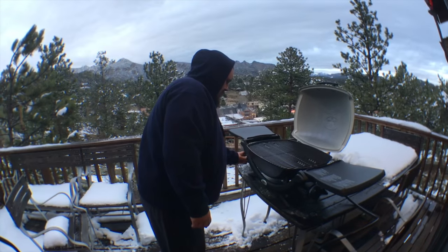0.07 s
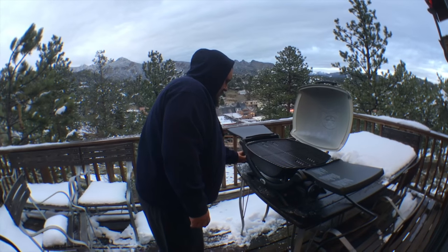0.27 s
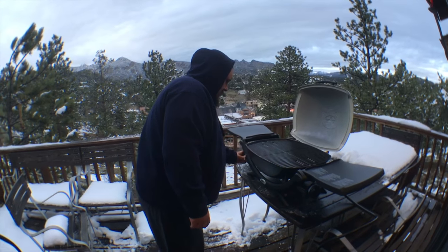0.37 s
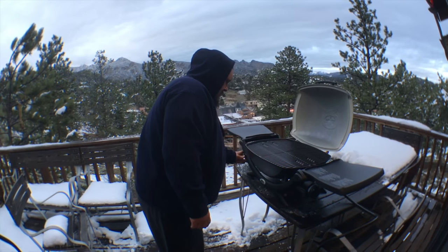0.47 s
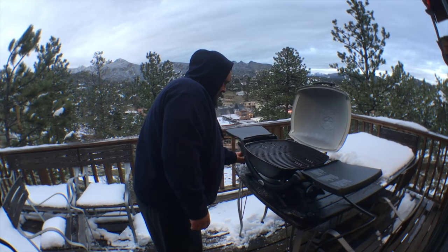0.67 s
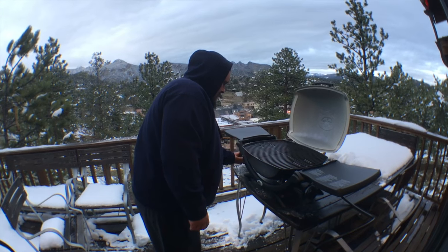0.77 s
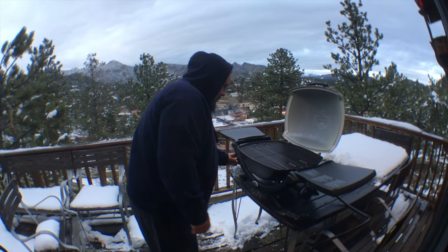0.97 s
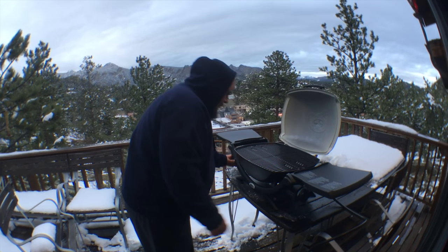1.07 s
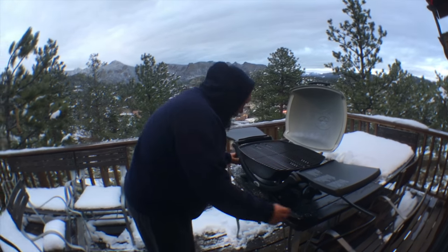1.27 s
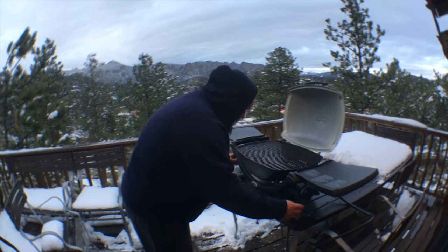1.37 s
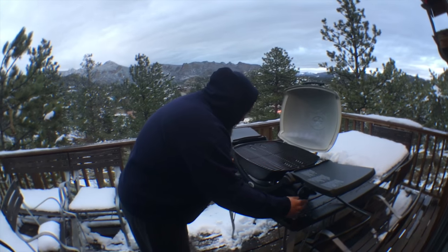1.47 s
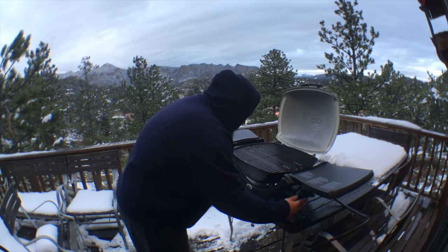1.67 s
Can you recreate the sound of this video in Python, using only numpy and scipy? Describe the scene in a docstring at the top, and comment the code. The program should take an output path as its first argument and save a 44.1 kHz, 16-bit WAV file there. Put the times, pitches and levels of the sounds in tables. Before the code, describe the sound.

A gas grill's push-button igniter snaps three times with a metallic ring, no flame, outdoors

```python
"""A push-button igniter on a gas grill, outdoors: filtered noise for the air, with a faint even treble ticking.
The button creaks in (rubbing noise through resonances) and its spring squeaks (short wavering sines).
The hammer snaps at 0.23, 0.72 and 1.41 s; each time a dense ring builds up in the metal body and dies,
with clear modes in it. Low background noise swells from 0.48 s; finger ticks and brushing (noise bursts)
come from 0.56 s. The button springs back, creaking, after snaps; the last creak is at 1.67 s."""
import sys
import numpy as np
from scipy import signal
from scipy.fft import rfft, irfft, next_fast_len
from scipy.io import wavfile
from scipy.ndimage import uniform_filter1d, map_coordinates

SR = 44100
rng = np.random.default_rng(int(sys.argv[2]) if len(sys.argv) > 2 else 0)


def wav_record(signal):
    """Record a signal, one row per channel, as 16-bit PCM in the file named by sys.argv[1]."""
    frames = np.transpose(np.atleast_2d(signal))
    bounded = np.clip(frames, -1, 1)
    # unit amplitude maps onto the largest positive 16-bit level
    quanta = np.round(bounded * 32767).astype(np.int16)
    wavfile.write(sys.argv[1], SR, quanta)


N = 77175

# All levels are ahead of the low cut and band limit in record().
# Outdoor air, spectrum shape: (frequency [Hz], relative level [dB])
AIR_SPECTRUM = [(26, -56), (45, 2.5), (356, -2), (568, -7.5), (709, -6), (1160, -7), (1680, -11),
                (1850, -12.5), (2100, -7.5), (2260, -14), (3780, -19), (4720, -21), (7920, -33),
                (16200, -42.5)]
AIR_RMS_DB, AIR_PATCH_DB = -64.5, 1.9
# Treble resonances of the even ticking: (centre [Hz], width [Hz], gain [dB])
TICKING_RESONANCES = [(8000, 900, 0), (10000, 1000, -2), (13500, 3000, -11), (6000, 1500, -10)]
TICKING_RATE_HZ, TICKING_START_S = 59.94, 0.0068
TICKING_PULSE_DB, TICKING_SPREAD_DB = -54, 0.83

# Button resonance centres: (frequency [Hz])
BUTTON_CENTRES_HZ = [1650, 2150, 2700, 3400, 4150, 4750, 6500, 8800, 9800, 11200, 12400]
# The same resonances: (width [Hz], gain before each creak's offsets [dB])
BUTTON_WIDTHS_GAINS = [(300, -2), (300, 1), (350, -4), (400, -4), (300, 2), (300, -5), (350, -11),
                       (350, -6), (350, -9), (400, -12), (400, -12)]
# Button creaking in or springing back: (time [s], level [dB], hold [s], t60 [s],
# offset of low resonances [dB], offset of high resonances [dB], roll-off [Hz])
BUTTON_CREAKS = [(.002, -58, .008, .08, -6, 4, 11500), (.150, -57, .012, .06, 8, 0, 6800),
                 (.165, -60, .065, .03, 2, 0, 7000), (.183, -56, .01, .06, 10, 0, 5000),
                 (.497, -54, .008, .05, -3, -7, 10000), (.514, -56, .012, .1, 5, -3, 13500),
                 (.606, -60, .012, .07, 12, 0, 3000), (.634, -62, .02, .05, 0, 0, 7000),
                 (.665, -65, .04, .04, 8, 0, 7000), (.699, -59, .005, .04, -8, 0, 5200),
                 (.971, -44, .002, .075, -8, -4, 12000), (1.122, -44.5, .009, .04, 12, 0, 6800),
                 (1.135, -58, .025, .08, 1, 0, 7200), (1.391, -62, .004, .04, -10, 0, 5200),
                 (1.669, -63, .012, .09, -3, 2, 13000)]
BUTTON_LOW_HZ, BUTTON_HIGH_HZ = 3000, 7500  # limits of the low and high resonances
GRAIN_DB, GRAIN_RATE_HZ = 2, 400  # random unevenness of creaks and brushes
# Squeaks of the spring: (time [s], pitch [Hz], length [s], peak level [dB])
SPRING_SQUEAKS = [(.165, 6800, .009, -54), (.175, 5850, .008, -54), (.213, 4500, .004, -51),
                  (.2245, 3050, .004, -50), (.2285, 3000, .005, -43), (.229, 6800, .004, -58),
                  (.514, 12000, .005, -67), (.516, 7200, .005, -61), (.627, 6700, .006, -60),
                  (.634, 3850, .02, -58), (.639, 2700, .012, -59), (.648, 4800, .012, -62),
                  (.672, 6400, .014, -67), (.7105, 3100, .008, -45), (1.4015, 3050, .009, -45),
                  (1.670, 8900, .012, -67), (1.671, 12200, .01, -65)]
SQUEAK_WAVER_SHARE, SQUEAK_WAVER_RATE_HZ = 0.017, 600  # share of the pitch

# Hammer snaps: (time [s], level [dB], new share of ring power [0-1], extra damping of low modes [dB/s])
HAMMER_SNAPS = [(0.233, -25.5, 0.07, 11), (.720, -25, 0, 65), (1.409, -25, 0.37, 152)]
# Dense ring of the body, spectrum shape: (frequency [Hz], relative level [dB])
BODY_SPECTRUM = [(71, -72.5), (120, -31), (349, -14.5), (494, -21), (1170, -19), (1410, -15), (1840, -7),
                 (2260, -10.5), (3930, 1), (4440, -3.5), (5340, -11.5), (7570, -27.5), (9290, -26.5),
                 (10100, -36.5), (14300, -35), (16200, -46.5)]
# Build-up of the dense ring: (frequency [Hz], build-up [s])
BODY_BUILD_UP = [(200, 0.065), (1200, 0.033), (2000, 0.026), (4000, 0.028), (7000, 0.019), (12000, 0.026)]
# Decay of the dense ring, before the late steepening: (frequency [Hz], t60 [s])
BODY_DECAY = [(200, 0.056), (1000, 0.24), (2000, .18), (4000, 0.071), (7000, 0.13), (14000, 0.077)]
BUILD_UP_DB, ONSET_S = 15, 0.007  # growth during the build-up; fade-in at its start
SLOW_RING_DB, SLOW_RING_T60_S = -17.5, 0.53
# Clear modes of the body: (frequency [Hz])
MODE_FREQS_HZ = [181, 1170, 1220, 1724, 2092, 2331, 3112, 3310, 3353, 3428, 3598, 3694, 3858, 3955, 4001,
                 4249, 4336, 4777, 4947, 5093, 5582, 7052]
# The same modes, before the late steepening: (level re dense ring [dB], t60 [s], build-up [s])
MODE_SHAPES = [(-21.5, 0.23, 0.015), (2, 0.3, 0.093), (-8, 0.35, 0.038), (-22, 0.14, .025),
               (-5, 0.24, 0.034), (-8, 0.079, 0.09), (-10, 0.26, .02), (2.5, 0.083, 0.0098),
               (-19.5, 0.18, 0.0067), (5.5, 0.15, 0.055), (-16.5, 0.42, 0.0083), (-12.5, 0.061, 0.0077),
               (-2, .27, 0.042), (-9.5, 0.36, 0.043), (-0.5, 0.38, 0.13), (-1.5, 0.12, 0.06),
               (11, 0.065, .02), (-8.5, 0.18, 0.011), (-17.5, 0.32, 0.011), (-16.5, 0.46, .025),
               (-19, 0.32, 0.022), (-23, .2, 0.054)]
LOW_MODES_HZ = 1500  # modes below it take the extra damping
# Late steepening of the ring: (frequency [Hz], age [s] at which the loss is STEEPEN_DB)
STEEPEN_AGES = [(600, .09), (1500, .15), (5600, .15), (7200, .125), (9500, .1), (11000, .08), (16000, .07)]
STEEPEN_DB, STEEPEN_MAX_DB = 9, 13

# Random swells of low background noise: (time [s], level [dB], band centre [Hz], length [s])
LOW_NOISE_SWELLS = [(.48, -66, 111, 0.16), (.56, -66.5, 123, 0.21), (1.1, -67, 143, 0.12),
                    (1.54, -60, 68, 0.12)]

# Finger ticks: (time [s], level [dB], band centre [Hz], width of each band pass [Hz], t60 [s], roll-off [Hz])
FINGER_TICKS = [(.5635, -56, 5750, 6900, 0.0115, 13700), (.574, -77.5, 7800, 3000, 0.025, 13000),
                (1.187, -34, 3180, 3240, 0.0076, 10100), (1.2326, -33, 3560, 1490, 0.0086, 11100),
                (1.2337, -41.5, 6400, 5050, 0.0078, 11000), (1.2337, -47, 1810, 500, 0.017, 6000),
                (1.249, -45.5, 5000, 5960, 0.008, 15800), (1.568, -46.5, 6100, 4950, 0.0059, 14500)]
TICK_TAIL_DB, TICK_TAIL_T60_S = -26, 0.13
# Hand brushing: (time [s], level [dB], hold [s], t60 [s])
HAND_BRUSHES = [(0.56, -77.5, 0.059, 0.061), (1.207, -62.5, 0.018, 0.055), (1.234, -54, 0.032, 0.091)]
# Brushing, spectrum shape: (frequency [Hz], relative level [dB])
BRUSH_SPECTRUM = [(590, -48), (1000, -18), (1350, -4), (1500, -9), (1900, -2), (2630, -11), (2790, -7),
                  (3520, -3), (4390, -12), (7950, -14), (10100, -22), (15100, -27), (16200, -30)]
BRUSH_LOW_HZ = 800

LOW_CUT_HZ, TOP_HZ = 79, 16100


def amp(db):
    """Amplitude factor of a level in dB."""
    return 10 ** (np.asarray(db) / 20)


def unit(x):
    """x scaled to rms 1."""
    return x / np.sqrt(np.mean(x ** 2) + 1e-20)


def along(points, hz):
    """Interpolate (frequency [Hz], value) points on a log frequency axis."""
    f, v = np.transpose(points)
    return np.interp(np.log(hz + 1), np.log(f + 1), v)


def filtered(x, response):
    """Apply a complex frequency response to x."""
    m = next_fast_len(len(x) + 4096)
    spectrum = rfft(x, m) * response(np.fft.rfftfreq(m, 1 / SR))
    return irfft(spectrum, m)[:len(x)]


def resonances(table):
    """Causal sum of (centre [Hz], width [Hz], gain [dB]) resonances with alternating signs."""
    def response(f):
        total = 0
        for k, (centre, width, db) in enumerate(table):
            damping = 1j * f * width
            total = total + (-1) ** k * amp(db) * damping / (centre * centre - f * f + damping)
        return total
    return response


def below(top_hz):
    """Steep roll-off over top_hz."""
    return lambda f: 1 / (1 + (f / top_hz) ** 16)


def add(out, time_s, x):
    """Mix x into out at time_s."""
    i = round(time_s * SR)
    out[i:i + len(x)] += x[:len(out) - i]


def burst(hold_s, t60_s):
    """Envelope of rubbing: quick attack, hold, exponential decay, grainy level."""
    t = np.arange(SR // 5) / SR
    grain = map_coordinates(rng.standard_normal(SR // 40), [t * GRAIN_RATE_HZ])
    attack = np.clip(t / 0.00033, 0, 1)
    return attack * amp(-60 * np.maximum(t - hold_s, 0) / t60_s + GRAIN_DB * grain)


def air():
    """Steady outdoor noise whose level varies faintly in patches of time and frequency."""
    z = signal.stft(rng.standard_normal(N), nperseg=512)[2]
    field = uniform_filter1d(rng.standard_normal(z.shape), 5, 0)
    patches = unit(uniform_filter1d(field, 8, 1))
    noise = signal.istft(z * amp(AIR_PATCH_DB * patches), nperseg=512)[1][:N]
    shaped = filtered(noise, lambda f: amp(along(AIR_SPECTRUM, f)))
    return amp(AIR_RMS_DB) * unit(shaped)


def ticking():
    """Evenly spaced pulses of slightly random level excite treble resonances."""
    pulses = np.zeros(N)
    times = np.arange(TICKING_START_S, N / SR - 0.001, 1 / TICKING_RATE_HZ)
    levels_db = TICKING_PULSE_DB + rng.normal(0, TICKING_SPREAD_DB, len(times))
    pulses[np.round(times * SR).astype(int)] = amp(levels_db)
    return filtered(pulses, resonances(TICKING_RESONANCES))


def button_creaks():
    """Rubbing noise excites the button's resonances; a second, wider pass steepens their skirts."""
    out = np.zeros(N)
    button = [(f, w, g) for f, (w, g) in zip(BUTTON_CENTRES_HZ, BUTTON_WIDTHS_GAINS)]
    steep = resonances([(f, 2 * w, 0) for f, w, _ in button])
    for time_s, db, hold_s, t60_s, low_db, high_db, top_hz in BUTTON_CREAKS:
        body = resonances([(f, w, g + low_db * (f < BUTTON_LOW_HZ) + high_db * (f > BUTTON_HIGH_HZ))
                           for f, w, g in button])
        roll_off = below(top_hz)
        noise = filtered(rng.standard_normal(SR // 5), lambda f: body(f) * steep(f) * roll_off(f))
        add(out, time_s, amp(db) * unit(noise) * burst(hold_s, t60_s))
    return out


def spring_squeaks():
    """Short sines of randomly wandering pitch under a half-sine envelope."""
    out = np.zeros(N)
    for time_s, hz, length_s, db in SPRING_SQUEAKS:
        t = np.arange(round(length_s * SR)) / SR
        wander = map_coordinates(rng.standard_normal(40), [t * SQUEAK_WAVER_RATE_HZ])
        pitch_hz = hz * (1 + SQUEAK_WAVER_SHARE * wander)
        tone = np.sin(2 * np.pi * np.cumsum(pitch_hz) / SR)
        add(out, time_s, amp(db) * np.sin(np.pi * t / length_s) * tone)
    return out


def steepening(t, hz):
    """Extra loss of an old ring by frequency, growing with the fourth power of age up to a limit."""
    loss_db = STEEPEN_DB * (t / along(STEEPEN_AGES, hz)) ** 4
    return amp(-np.minimum(loss_db, STEEPEN_MAX_DB))


def dense_ring(n):
    """Dense modes as noise that builds up and decays by band, in a fast and a slow part."""
    hz, t, z = signal.stft(rng.standard_normal(n), SR, nperseg=128)
    hz = hz[:, None]
    rise_s, t60_s = along(BODY_BUILD_UP, hz), along(BODY_DECAY, hz)
    age = np.maximum(t - rise_s, 0)
    build_up = amp(-BUILD_UP_DB * np.maximum(1 - t / rise_s, 0))
    decay = amp(-60 * age / t60_s) + amp(SLOW_RING_DB - 60 * age / SLOW_RING_T60_S)
    noise = signal.istft(z * build_up * decay * steepening(t, hz), SR, nperseg=128)[1][:n]
    dense = filtered(noise, lambda f: amp(along(BODY_SPECTRUM, f)))
    reference_rms = np.sqrt(np.mean(dense[SR // 50:SR // 30] ** 2))  # 20 to 33 ms
    onset = np.clip(np.arange(n) / SR / ONSET_S, 0, 1) ** 2
    return dense / reference_rms * onset


def body_ring():
    """One draw of the body's answer to a blow: [dense ring and high modes, low modes]."""
    n = SR // 2
    t = np.arange(n) / SR
    out = np.array([dense_ring(n), np.zeros(n)])
    for hz, (db, t60_s, build_s) in zip(MODE_FREQS_HZ, MODE_SHAPES):
        grow = 1 - np.exp(-(t / build_s) ** 2)
        level = amp(db - 60 * t / t60_s) * grow * steepening(t, hz)
        out[int(hz < LOW_MODES_HZ)] += level * np.sin(2 * np.pi * (hz * t + rng.random()))
    return out


def hammer_snaps():
    """Each snap rings the same body: a common ring mixed by power with a new draw, low modes damped."""
    out, common = np.zeros(N), body_ring()
    for time_s, db, new_share, damp_db_per_s in HAMMER_SNAPS:
        high, low = np.sqrt(1 - new_share) * common + np.sqrt(new_share) * body_ring()
        damping = amp(-damp_db_per_s * np.arange(len(low)) / SR)
        add(out, time_s, amp(db) * (high + low * damping))
    return out


def low_noise_swells():
    """Noise through a low resonance twice, swelling and fading under a Hann window."""
    out = np.zeros(N)
    for time_s, db, hz, length_s in LOW_NOISE_SWELLS:
        band = resonances([(hz, hz / 2, 0)])
        noise = filtered(filtered(rng.standard_normal(SR // 2), band), band)
        noise = unit(noise)[-round(length_s * SR):]  # settled end of the filter output
        add(out, time_s, amp(db) * noise * np.hanning(len(noise)))
    return out


def finger_ticks():
    """Sharp band-passed noise with a fast decay and a weak tail, the short answer of the metal."""
    out, t = np.zeros(N), np.arange(SR // 8) / SR
    attack = np.clip(t / 0.00045, 0, 1)
    tail = amp(TICK_TAIL_DB - 60 * t / TICK_TAIL_T60_S)
    for time_s, db, hz, width_hz, t60_s, top_hz in FINGER_TICKS:
        band, roll_off = resonances([(hz, width_hz, 0)]), below(top_hz)
        noise = unit(filtered(rng.standard_normal(len(t)), lambda f: band(f) ** 2 * roll_off(f)))
        add(out, time_s, amp(db) * noise * attack * (amp(-60 * t / t60_s) + tail))
    return out


def hand_brushes():
    """Rubbing noise of a hand on the grill, shaped by the brushing spectrum."""
    out = np.zeros(N)
    for time_s, db, hold_s, t60_s in HAND_BRUSHES:
        noise = filtered(rng.standard_normal(SR // 5),
                         lambda f: amp(along(BRUSH_SPECTRUM, f)) * (f > BRUSH_LOW_HZ))
        add(out, time_s, amp(db) * unit(noise) * burst(hold_s, t60_s))
    return out


def scene():
    """Sum of all sources, one channel."""
    background = air() + ticking() + low_noise_swells()
    igniter = button_creaks() + spring_squeaks() + hammer_snaps()
    hand = finger_ticks() + hand_brushes()
    return (background + igniter + hand)[None]


def record(dry):
    """Cut the deep bass smoothly and remove everything from TOP_HZ up."""
    def response(hz):
        low_cut = hz ** 3 / (hz ** 3 + LOW_CUT_HZ ** 3)
        return (hz < TOP_HZ) * low_cut
    return filtered(dry[0], response)[None]


dry = scene()
out = record(dry)
wav_record(out)
```